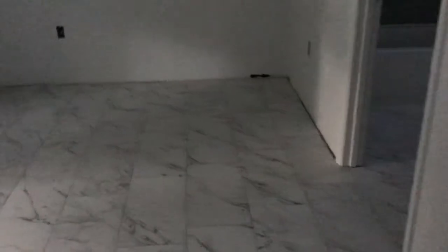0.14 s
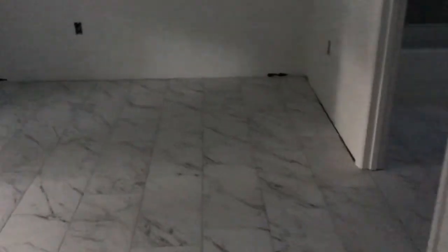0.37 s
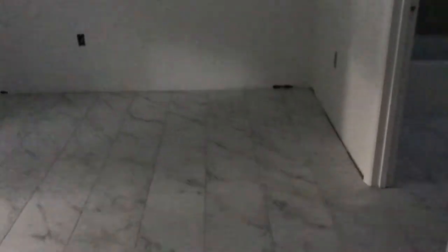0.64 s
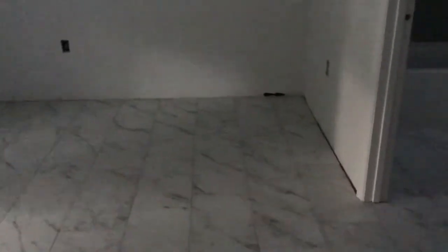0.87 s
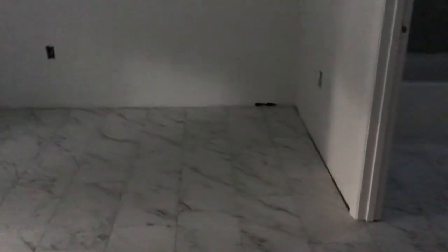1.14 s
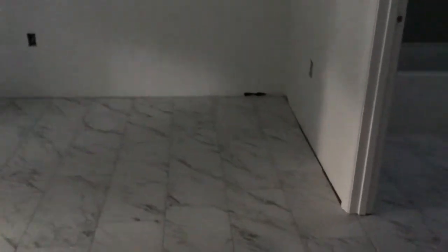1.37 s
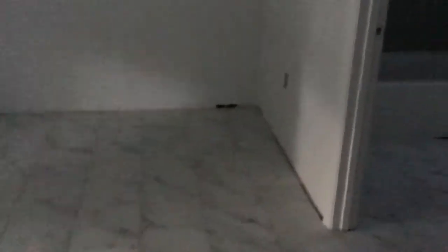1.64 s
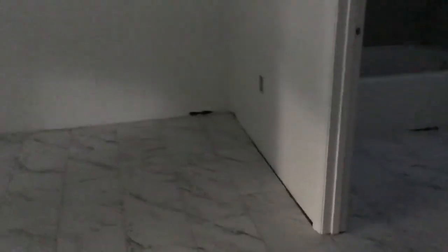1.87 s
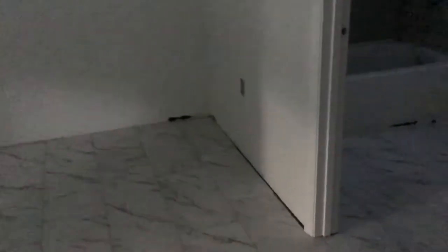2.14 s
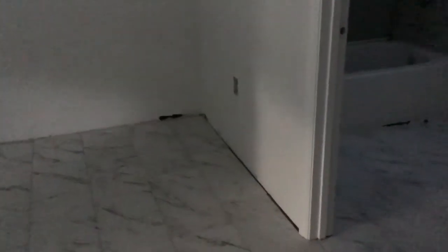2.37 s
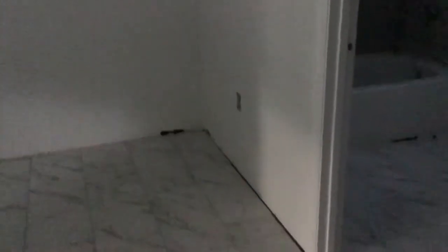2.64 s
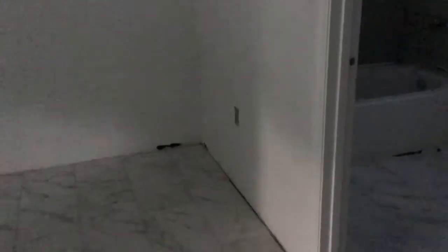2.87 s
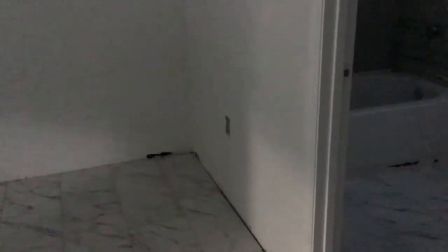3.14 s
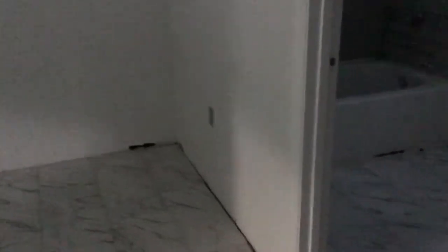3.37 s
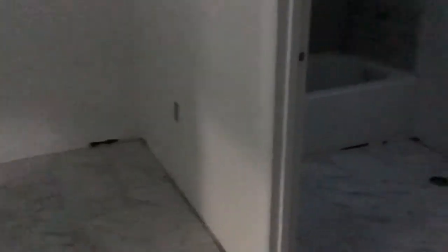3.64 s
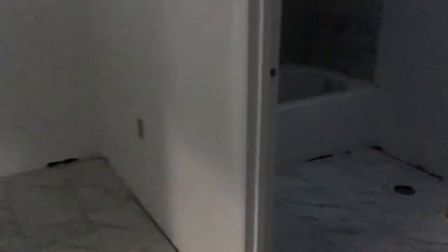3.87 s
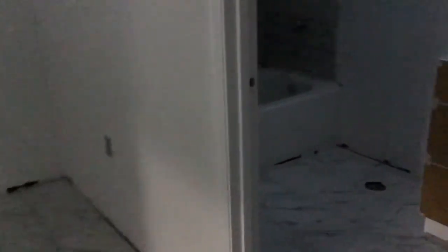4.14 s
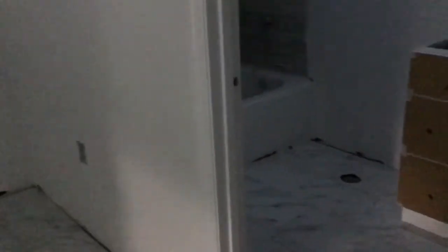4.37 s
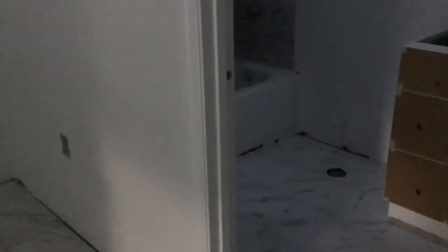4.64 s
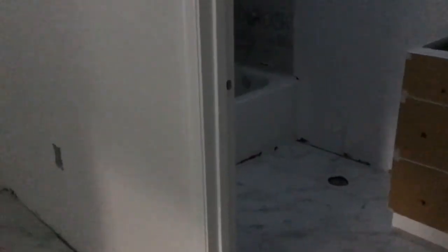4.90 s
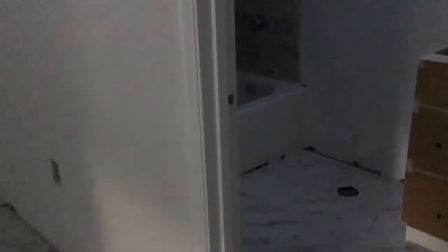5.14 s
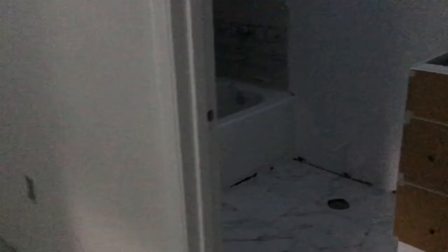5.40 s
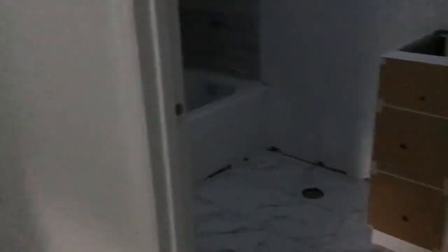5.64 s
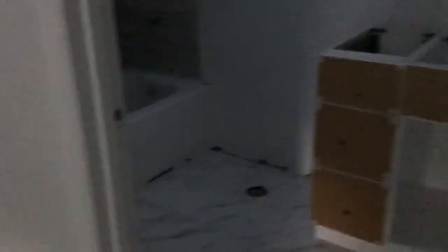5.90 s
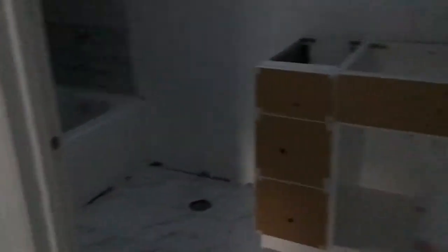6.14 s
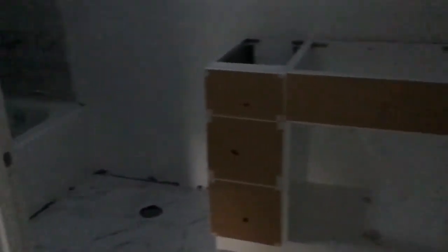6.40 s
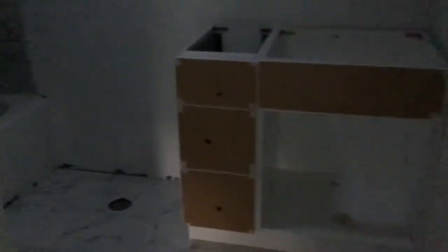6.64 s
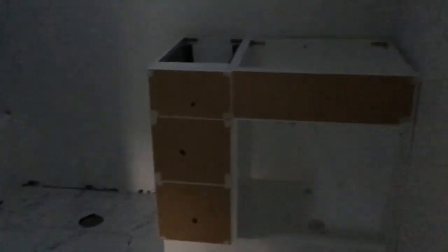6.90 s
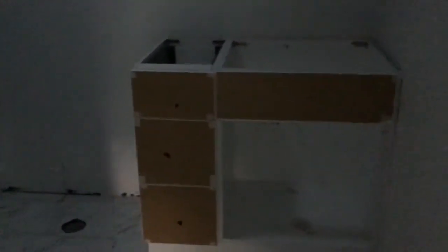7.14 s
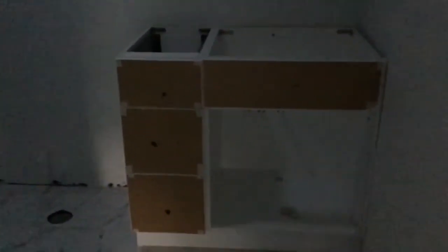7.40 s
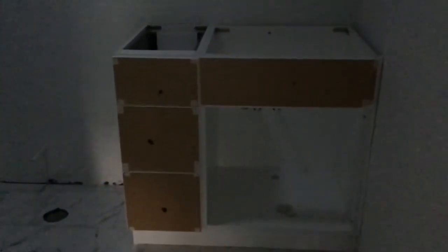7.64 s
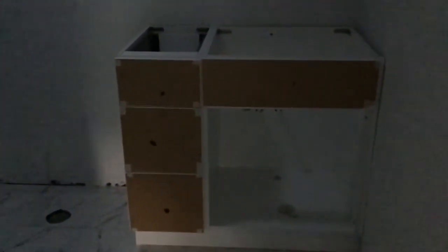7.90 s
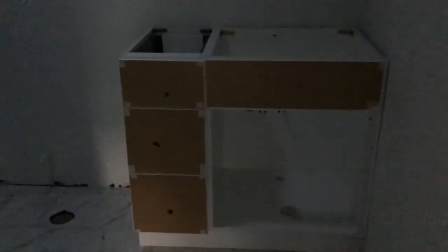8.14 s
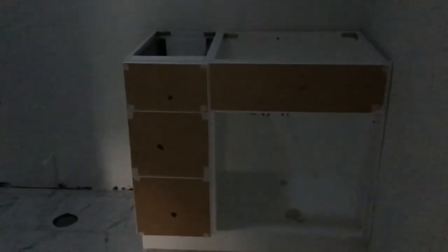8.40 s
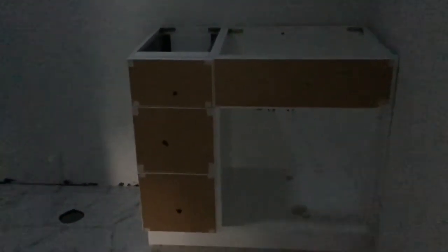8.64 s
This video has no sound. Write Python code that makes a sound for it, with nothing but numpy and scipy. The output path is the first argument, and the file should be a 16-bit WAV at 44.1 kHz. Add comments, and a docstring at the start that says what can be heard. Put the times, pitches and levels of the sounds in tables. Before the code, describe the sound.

Dull low thuds of slow steps and finger bumps on a hand-held camera, with grip rubbing, clothes swishing and faint electronic hiss in a quiet room.

```python
"""In an empty flat with a tiled floor someone walks slowly, holding a small camera.
Steps and finger bumps ring damped modes of hand and casing, spread into thuds that fall in pitch.
The grip rumbles and rubs as skin slips in tiny jerks; clothes swish with each stride as shaped noise, over
a background noise that sinks after about 5.7 s and rises again at the end.
The camera's electronics hiss, tick and beep, and faint narrow hisses come and go."""
import sys
import numpy as np
from scipy import signal
from scipy.fft import rfft, irfft
from scipy.io import wavfile

SR = 44100
rng = np.random.default_rng(int(sys.argv[2]) if len(sys.argv) > 2 else 0)


def natural_amplitude(level_db):
    """Convert a level in decibels to a linear amplitude factor, elementwise."""
    exponent = np.asarray(level_db, float) / 20
    return 10 ** exponent


def file_out(sig):
    """Save sig as 16-bit WAV at sys.argv[1]."""
    # one column per channel
    cols = np.atleast_2d(sig).T
    # limit, then scale
    lim = np.clip(cols, -1, 1)
    pcm = np.round(lim * 32767).astype(np.int16)
    wavfile.write(sys.argv[1], SR, pcm)


N = 386757
USUAL_RUB_DB = -68


def rms_one(x):
    """Scale to rms 1."""
    return x / np.sqrt(np.mean(x ** 2) + 1e-20)


def peak_one(x):
    """Scale to peak 1."""
    return x / np.abs(x).max()


def in_time(rows):
    """Interpolate each column over the scene; the first column is time in s."""
    s, *columns = np.transpose(rows)
    return [np.interp(np.arange(N) / SR, s, c) for c in columns]


def coloured(x, spectrum):
    """Shape a signal by a (Hz, dB) spectrum, straight in log frequency; rms 1."""
    hz = np.maximum(np.fft.rfftfreq(len(x), 1 / SR), 1)
    points_hz, points_db = np.array(spectrum, float).T
    gain_db = np.interp(np.log(hz), np.log(points_hz), points_db, left=-90, right=-90)
    return rms_one(irfft(rfft(x) * natural_amplitude(gain_db), len(x)))


def drift(rate_hz):
    """Slow chance with spread 1: noise through two equal low-pass poles, run at SR / 40."""
    r = np.exp(-80 * np.pi * rate_hz / SR)
    noise = rng.standard_normal(N // 40 + 2002)
    slow = signal.lfilter([1], [1, -2 * r, r * r], noise)[2000:]      # drop the run-in
    return np.interp(np.arange(N) / 40, np.arange(len(slow)), rms_one(slow))


def swells(rows):
    """A bell-shaped swell for each row of (middle_s, length_s, ..)."""
    t = np.arange(N) / SR
    return np.array([np.exp(-(2 * (t - row[0]) / row[1]) ** 2) for row in rows])


def with_swells(base_db, shapes, peaks_db):
    """Add the power of the swells to a base level; dB."""
    return 10 * np.log10(natural_amplitude(base_db) ** 2 + natural_amplitude(peaks_db) ** 2 @ shapes ** 2)


def ring(x, hz, t60_s):
    """Two-pole resonator: a unit click sets a decaying sine of height 1 ringing."""
    r, w = natural_amplitude(-60 / (t60_s * SR)), 2 * np.pi * hz / SR
    return signal.lfilter([0, np.sin(w)], [1, -2 * r * np.cos(w), r * r], x + 1e-18)


def whines():
    """Narrow treble bands of noise that swell and fade."""
    # middle_s, length_s, pitch_hz, width_hz, level_db
    whine_rows = [(3.15, .25, 13000, 1800, -93), (3.153, .3, 6440, 500, -89), (5.202, .25, 6360, 700, -91),
                  (5.454, 0.24, 6700, 506, -85.5), (5.25, .3, 12000, 900, -100),
                  (7.349, .4, 13400, 1500, -93)]
    t, out = np.arange(N) / SR, 0
    for middle_s, length_s, hz, width_hz, level_db in whine_rows:
        band = signal.butter(2, [hz - width_hz / 2, hz + width_hz / 2], "band", fs=SR, output="sos")
        swell = np.exp(-(2 * (t - middle_s) / length_s) ** 4)
        noise = rms_one(signal.sosfilt(band, rng.standard_normal(N)))
        out = out + natural_amplitude(level_db) * swell * noise
    return out


def ticks(rate_hz, start_s, jitter_s, spread_db):
    """A steady train of slightly uneven clicks."""
    s = start_s + np.arange(int(N / SR * rate_hz)) / rate_hz
    draw, train = rng.standard_normal((len(s), 2)), np.zeros(N)
    at = ((s + jitter_s * draw[:, 0]) * SR).astype(int)
    train[np.clip(at, 0, N - 1)] = natural_amplitude(spread_db * draw[:, 1])
    return train


def electronics(hiss_db=-88, frame_tick_db=-68, clock_tick_db=-67, buzz_db=-95):
    """Preamp hiss; a tick, short beep and high buzz on every frame; a slower clock tick."""
    # preamp hiss spectrum: pitch_hz, density_db
    hiss_spectrum = [(2000, -18), (7300, -21.5), (8200, 0), (9500, -2.5), (11000, -0.5), (12500, -6),
                     (14000, -9), (15300, -22)]
    # frame beep: time_s, level_db
    beep_levels = [(0, -76), (5.55, -78.5), (5.75, -83), (8.3, -84), (8.37, -84), (8.45, -74),
                   (8.77, -80.5)]
    frames = ticks(29.97, start_s=.0024, jitter_s=.0009, spread_db=2.5)
    clock = ticks(19.99, start_s=.0012, jitter_s=.0001, spread_db=1.5)
    clicks = natural_amplitude(frame_tick_db) * frames + natural_amplitude(clock_tick_db) * clock
    tick = ring(clicks, 8400, .003) - ring(clicks, 9500, .0025)

    t = np.arange(round(.007 * SR)) / SR
    swell = np.hanning(len(t))
    beep = np.convolve(frames, swell * np.sin(2 * np.pi * 4125 * t))[60:N + 60]      # 60 samples early
    buzz = np.convolve(frames, swell * np.sin(2 * np.pi * 14330 * t))[:N]
    hiss = coloured(rng.standard_normal(N), hiss_spectrum)
    beep_db = in_time(beep_levels)[0]
    return natural_amplitude(hiss_db) * hiss + tick + natural_amplitude(beep_db) * beep + natural_amplitude(buzz_db) * buzz


def clothes(patchy_db=1.5):
    """Cloth brushes on cloth at each stride, over a background noise: two bands of shaped noise."""
    # spectra of main swish and treble: pitch_hz, density_db
    swish_spectrum = [(500, 7), (900, -1), (1500, -0.5), (2200, -3), (3200, -7), (4500, -12.5), (6000, -33)]
    treble_spectrum = [(3000, -12), (4500, 0), (6500, -1), (7500, -3.5), (9000, -5), (13000, -13)]
    # cloth brushes: middle_s, length_s, swish_db, treble_db
    strides = [(1.12, 0.35, -73, -89), (1.558, 0.14, -76, -84), (2.034, 0.76, -75.5, -99),
               (3.153, 0.55, -72, -87.5), (4.34, 0.56, -73, -87), (5.175, 0.18, -76, -86),
               (5.43, 0.41, -72, -83), (6.478, 0.24, -74.5, -94), (6.98, 0.66, -76.5, -86.5),
               (8.458, 0.26, -92.5, -89.5), (8.77, 0.56, -81, -100)]
    # background noise, sinking after about 5.7 s and rising at the end: time_s, swish_db, treble_db
    background_levels = [(0, -77.5, -88), (1.5, -77.5, -85), (2.7, -79, -87), (5.7, -80.5, -86.5),
                         (7.2, -83, -90.5), (7.65, -86.5, -90), (8.35, -88.5, -90.5), (8.77, -80.5, -87.5)]
    swish_db, treble_db = in_time(background_levels)
    shapes, rows = swells(strides), np.array(strides)
    swish_db = with_swells(swish_db, shapes, rows[:, 2]) + patchy_db * drift(16.0)
    treble_db = with_swells(treble_db, shapes, rows[:, 3])
    swish = coloured(rng.standard_normal(N), swish_spectrum) * natural_amplitude(swish_db)
    return swish + coloured(rng.standard_normal(N), treble_spectrum) * natural_amplitude(treble_db)


def grip_levels(dry_re_rub_db=-13.5):
    """Deep rumble, rub and dry rub levels in dB: the hold plus swells in the grip noise."""
    # the hand holding the casing: time_s, deep_rumble_db, rub_db
    hold = [(0, -45, -73.5), (.3, -47.5, -66.5), (.7, -51.5, -59.5), (1.0, -49.5, -69), (1.45, -47, -68),
            (1.8, -49.5, -71), (2.2, -52, -71.5), (2.6, -64, -68), (3.05, -61, -69), (3.42, -56, -72.5),
            (4.0, -51, -74.5), (4.55, -58.5, -70), (4.9, -52.5, -73), (5.6, -56, -71.5), (6.0, -58, -63),
            (6.3, -40.5, -57.5), (6.75, -43.5, -51.5), (7.1, -49.5, -63.5), (7.33, -53.5, -51),
            (7.43, -60.5, -67.5), (7.6, -54.5, -80.5), (7.95, -59.5, -74.5), (8.43, -56.5, -75.5),
            (8.77, -45, -50)]
    # swells in the grip noise (hand shifts, dry scuffs, low tails after bumps):
    # middle_s, length_s, deep_rumble_db, rub_db, extra_dry_rub_db
    grip_swells = [(0.402, 0.068, -39, -66, 6), (0.644, 0.053, -58, -54, 6), (0.853, 0.24, -44.5, -61, -7),
                   (1.117, 0.11, -40, -60, -0.5), (2.436, 0.12, -47.5, -109, 5),
                   (2.646, 0.11, -48, -59.5, 10), (2.788, 0.098, -26.5, -59, 4),
                   (2.954, 0.097, -39.5, -64, -4), (3.213, 0.2, -46.5, -62, -3),
                   (3.677, 0.22, -40.5, -65, 2), (3.893, 0.1, -36.5, -57.5, -12),
                   (4.37, 0.23, -39.5, -56.5, 1.5), (4.754, 0.14, -47.5, -76, 1),
                   (5.167, 0.22, -39.5, -51.5, -7), (5.39, 0.15, -47, -54.5, -3),
                   (5.88, 0.12, -52, -63.5, 5), (6.534, 0.25, -39, -46, 1.5), (6.87, 0.18, -45.5, -49, -2),
                   (7.105, 0.12, -65, -52, 5), (7.265, 0.15, -43, -56, 6), (8.221, 0.047, -38, -81, 6)]
    deep_db, rub_db = in_time(hold)
    shapes, rows = swells(grip_swells), np.array(grip_swells)
    deep_db = with_swells(deep_db, shapes, rows[:, 2])
    rub_db = with_swells(rub_db, shapes, rows[:, 3])
    dry_db = rub_db + dry_re_rub_db + rows[:, 4] @ shapes
    return deep_db, rub_db, dry_db


def grip(deep_db, rub_db, dry_db, slips_per_s=250, size_db=3.5, lumpy_db=1.0, patchy_db=1.2):
    """Skin slips on the casing in dense tiny jerks; the mass rumbles, the shell rubs unevenly."""
    # spectra of the moving mass: pitch_hz, density_db
    deep_spectrum = [(20, -26), (40, -7), (62, -5), (85, -5), (105, -10.5), (140, -22.5)]
    rumble_spectrum = [(80, -25.5), (110, -3), (155, 0.5), (200, -6.5), (280, -39)]
    # spectra of the rubbed shell: pitch_hz, density_db
    rub_spectrum = [(160, -30), (230, 7.5), (320, -2.5), (420, -8), (560, -30.5)]
    dry_rub_spectrum = [(330, -19), (450, 0), (600, 5), (800, -2.5), (1100, -21.5), (1600, -26),
                        (2500, -50.5)]
    rumble_db = -59 + 0.68 * (rub_db - USUAL_RUB_DB)      # takes a share of the rub's swing

    moments = rng.random(N) < slips_per_s / SR
    sizes = natural_amplitude(size_db * np.minimum(rng.exponential(1, N), 4))
    slips = moments * sizes * rng.choice([-1, 1], N)
    slips = slips + 0.087 * rng.standard_normal(N)
    mass = rng.standard_normal(N) * natural_amplitude(lumpy_db * drift(3.4))

    rumble = coloured(mass, deep_spectrum) * natural_amplitude(deep_db)
    rumble = rumble + coloured(mass, rumble_spectrum) * natural_amplitude(rumble_db)
    rub = coloured(slips, rub_spectrum) * natural_amplitude(rub_db)
    rub = rub + coloured(slips, dry_rub_spectrum) * natural_amplitude(dry_db)
    return rumble + rub * natural_amplitude(patchy_db * drift(4.4))


def fidgets(rub_db, count=16):
    """Small finger bumps at random moments; their body level partly follows the rub."""
    usual_body_db, thud_db, knock_db, crack_db = -40.5, -12, -25.5, -34.5
    follows, spread_db = 0.47, 3
    s, size = rng.random((count, 2)).T
    at = (s * (N - 1)).astype(int)
    body_db = usual_body_db + follows * (rub_db[at] - USUAL_RUB_DB) + spread_db * (2 * size - 1)
    return [(i / SR, db, thud_db, knock_db, crack_db) for i, db in zip(at, body_db)]


def blunt(x, hz):
    """A soft contact gives no treble: low-pass."""
    return signal.sosfilt(signal.butter(4, hz, fs=SR, output="sos"), x)


def bending(x, delay_ms, power):
    """Bending waves in a solid: treble comes first, bass lags as a power of wavelength."""
    scaled = (np.fft.rfftfreq(len(x), 1 / SR) + 30) / 130      # 1 at 100 Hz, where delay_ms holds
    turns = .13 * delay_ms * scaled ** (1 - power) / (1 - power)
    t = np.arange(len(x)) / SR
    ends = np.minimum(1, np.minimum(t / .001, (t[-1] - t) / .05))
    return ends * irfft(rfft(x) * np.exp(-2j * np.pi * (turns - turns[0])), len(x))


def bumps(rows, fall_db=17.0, crack_s=0.0072, delay_ms=3.564, power=0.81):
    """Each bump rings thud, body and knock modes, spread out by the path, with a short rough crack."""
    # modes of hand and casing, before chance and contact weighting: pitch_hz, level_db, t60_s
    casing = [(67.8, -14, 0.025), (87.3, 1.5, 0.16), (97.3, 2, .16), (134.8, -2.5, 0.13),
              (154.9, 1.5, 0.15), (196.5, -1, 0.071), (236.1, -8, 0.12), (283, -9, 0.061),
              (381, -0.5, 0.056), (435, 1.5, 0.054), (542.5, 2.5, 0.029), (675, 0, 0.024), (740, 3, 0.025),
              (1140, -12, 0.026)]
    # crack spectrum: pitch_hz, density_db
    crack_spectrum = [(800, -12), (1200, 8), (1900, 3.5), (3100, -3.5), (4800, -15.5), (5900, -26.5),
                      (7800, -28.5), (8800, -23.5), (12000, -42)]
    body_from_hz, knock_from_hz, mode_spread_db = 115, 330, 4
    rebound_s, rebound = .005, .3
    soft_colour_hz, hard_from_db, octaves_per_db = 412, -43, .033

    size = 16384
    out, t = np.zeros(N + size), np.arange(size) / SR
    crack_swell = np.exp(-(t / crack_s) ** 3) * (1 - np.exp(-(t / 0.0011) ** 2))
    chance = rng.standard_normal((len(rows), len(casing) + 1 + size))
    pitch = np.array(casing)[:, 0]
    low, high = pitch < body_from_hz, pitch > knock_from_hz
    for (s, body_db, thud_db, knock_db, crack_db), draw in zip(rows, chance):
        # a harder contact (louder crack) rings higher knock modes
        colour_hz = soft_colour_hz * 2 ** (octaves_per_db * max(0, crack_db - hard_from_db))
        touch = np.zeros(size)
        touch[0] = 1
        second = round(rebound_s * SR * natural_amplitude(3 * draw[len(casing)]))
        touch[second] += rebound      # a weaker second touch
        modes = np.array([natural_amplitude(db + mode_spread_db * g) * ring(touch, hz, t60_s)
                          for (hz, db, t60_s), g in zip(casing, draw)])

        thud = peak_one(blunt(modes[low].sum(axis=0), 170))
        body = peak_one(blunt(modes[~low & ~high].sum(axis=0), 320))
        nearness = natural_amplitude(-fall_db * np.log2(pitch[high] / colour_hz) ** 2)
        knock = peak_one(blunt(nearness @ modes[high], 2 * colour_hz))
        solid = body + natural_amplitude(thud_db) * thud + natural_amplitude(knock_db) * knock
        solid = bending(solid, delay_ms, min(power, .97))
        crack = coloured(draw[-size:], crack_spectrum) * crack_swell
        at = round(s * SR)
        out[at:at + size] += natural_amplitude(body_db) * (solid + natural_amplitude(crack_db) * crack)
    # the hand soaks up the slowest motion
    return signal.sosfilt(signal.butter(2, 50, "high", fs=SR, output="sos"), out[:N])


def scene():
    """Sum of all sources, one channel."""
    # steps and finger bumps: start_s, body_db; re body: thud_db, knock_db, crack_db
    bump_rows = [(0.228, -40.5, 7, -16.5, -39), (0.377, -47, -2, -2, -34), (0.504, -34, -3.5, -12.5, -51),
                 (0.641, -39, 12, -8, -49), (0.765, -20, -13, -7, -27.5), (0.775, -8.5, -11.5, -11, -59),
                 (1.088, -36, -1.5, -21, -38), (1.132, -30.5, 6, -11.5, -52),
                 (1.517, -23.5, -35, -21.5, -48), (2.191, -47, -13, -16, -29),
                 (2.653, -18.5, -10, -20.5, -50.5), (2.745, -24.5, 9, -9.5, -42),
                 (2.764, -16, -5, -7, -34.5), (2.93, -21, 2.5, -9, -47.5), (3.193, -36, 8, -12, -46),
                 (3.241, -38, 7, -15, -46), (3.852, -32, 2, -10, -33), (3.861, -21.5, 2, -9, -57),
                 (4.064, -34, -1, -14, -55), (4.273, -36, -2, -20, -31), (4.3, -34.5, -7, -11, -46),
                 (4.34, -28, -21, -14, -41), (4.39, -22.5, -44, -19.5, -58), (4.419, -28.5, -0.5, -21, -56),
                 (4.51, -47.5, 13, -30, -15.5), (5.06, -36, 0.5, -22, -51), (5.112, -26.5, -18, -29, -48),
                 (5.225, -30, -6, -9.5, -53), (5.418, -20.5, -6.5, -14, -50), (5.426, -18, -13, -16, -58),
                 (5.637, -45, 7, -2.5, -25), (5.804, -38.5, -1, -33, -49), (5.877, -45, -7, -16, -31),
                 (6.01, -31, -20, -32, -61), (6.187, -32, -7.5, -3, -54), (6.395, -16, -20, -9.5, -48.5),
                 (6.4425, -17, -16, 5.5, -19.5), (6.4455, -12.5, 0.5, 3.5, -38),
                 (6.467, -27.5, -8, -6, -32.5), (6.545, -31, -1, 2, -33), (6.566, -19, -28, -23, -54),
                 (6.66, -31, -5, -8, -40), (6.822, -32, 1, -13, -45), (6.895, -47, -14, -1, -42),
                 (7.077, -32.5, -5, -10, -39), (7.237, -41, -2.5, -10, -38), (7.366, -13, -9.5, -1, -37.5),
                 (7.602, -31.5, -24, -10, -43.5), (8.202, -30, -38, -47, -56),
                 (8.584, -14.5, -22, -8.5, -53), (8.651, -9, 0, -8.5, -33), (8.738, -23, 5, -41.5, -55),
                 (8.753, -29.5, 0, -11, -34.5)]
    deep_db, rub_db, dry_db = grip_levels()
    background = whines() + electronics() + clothes()
    handling = grip(deep_db, rub_db, dry_db) + bumps(bump_rows + fidgets(rub_db))
    return (background + handling)[None]


def band_limit(x):
    """A steep low-pass at the top of the band."""
    return signal.sosfilt(signal.butter(12, 15600, fs=SR, output="sos"), x)


def record(dry):
    """The small microphone loses the deepest bass; a 4 ms fade ends the sound."""
    heard = signal.sosfilt(signal.butter(4, 56, "high", fs=SR, output="sos"), dry)
    fade = np.minimum(1, (N - 1 - np.arange(N)) / (.004 * SR))
    return band_limit(heard * fade)


dry = scene()
out = record(dry)
file_out(out)
```